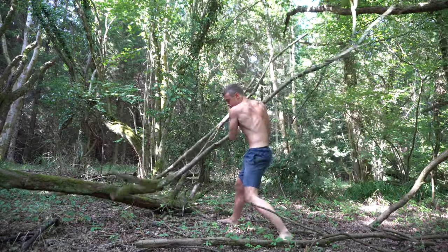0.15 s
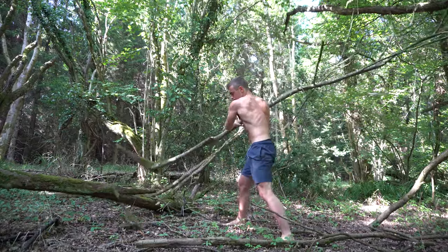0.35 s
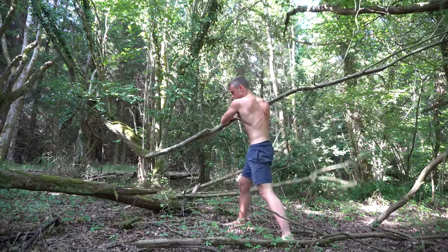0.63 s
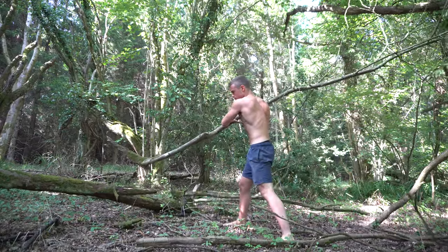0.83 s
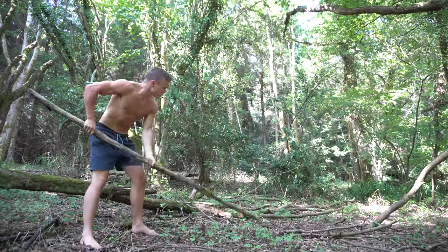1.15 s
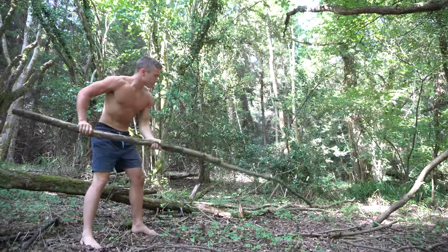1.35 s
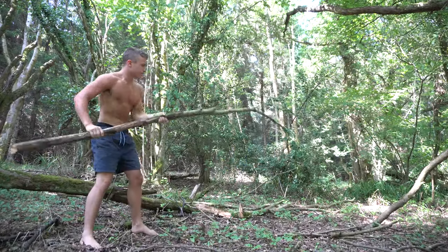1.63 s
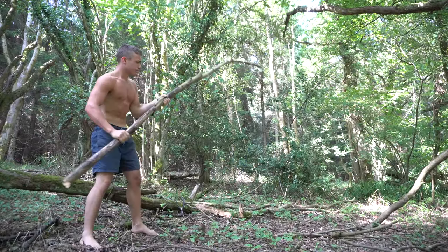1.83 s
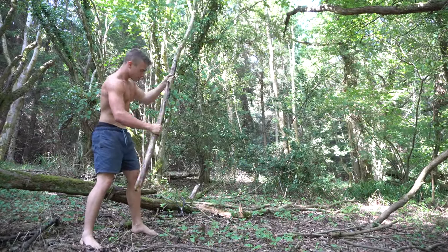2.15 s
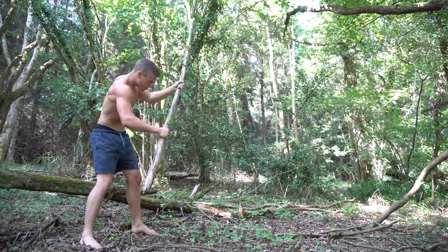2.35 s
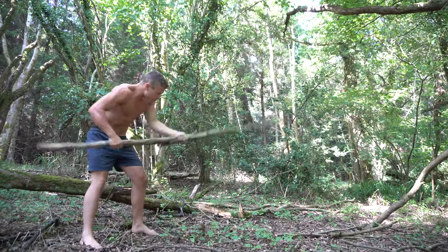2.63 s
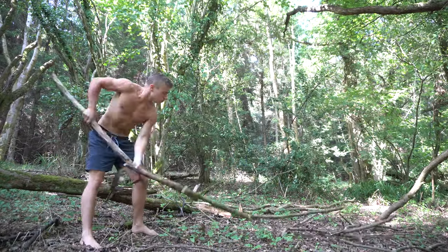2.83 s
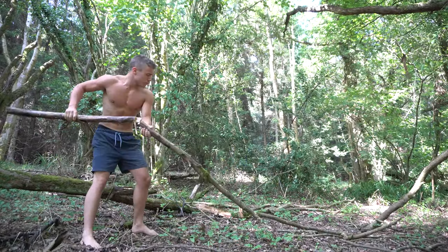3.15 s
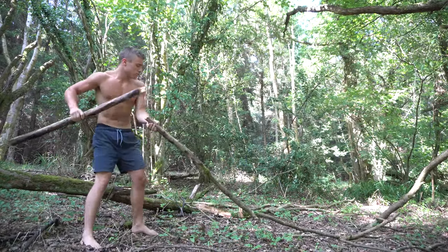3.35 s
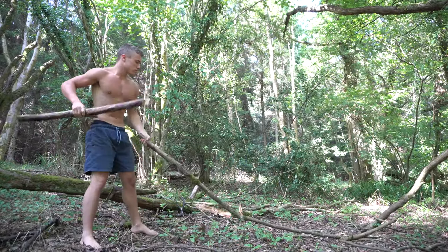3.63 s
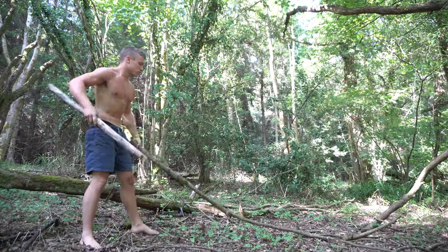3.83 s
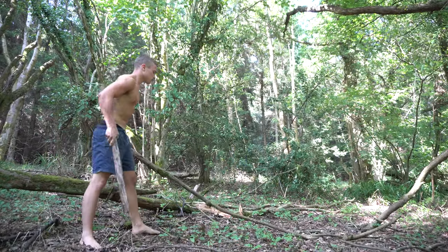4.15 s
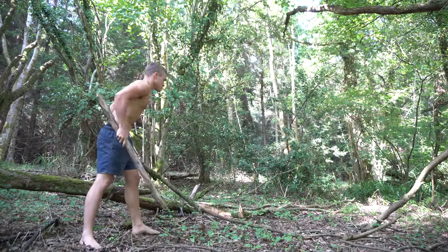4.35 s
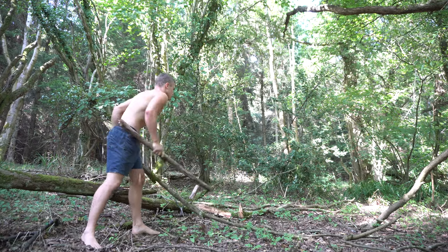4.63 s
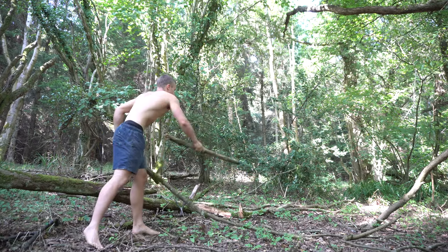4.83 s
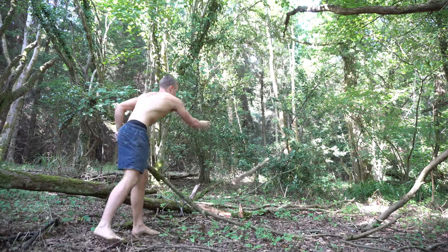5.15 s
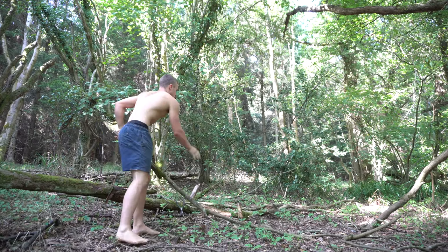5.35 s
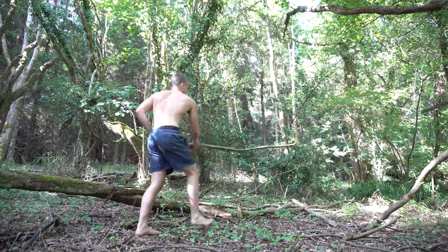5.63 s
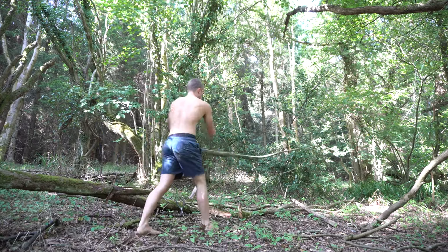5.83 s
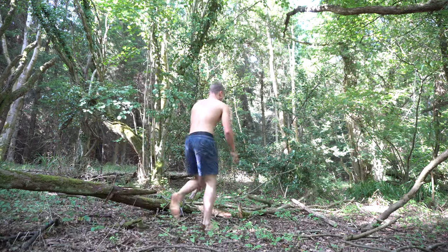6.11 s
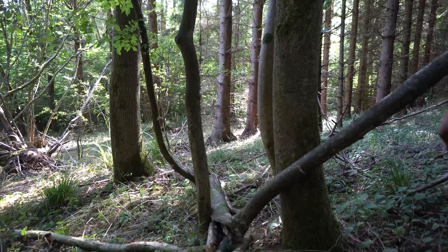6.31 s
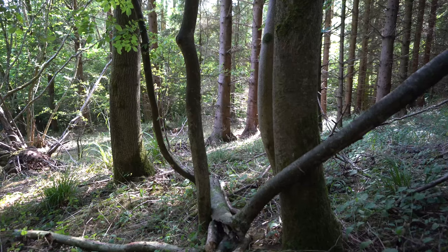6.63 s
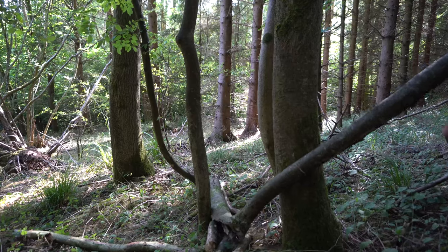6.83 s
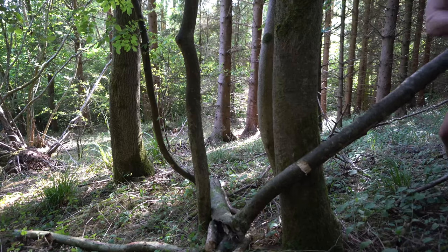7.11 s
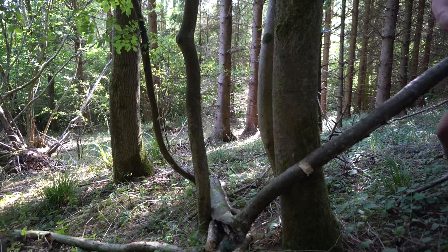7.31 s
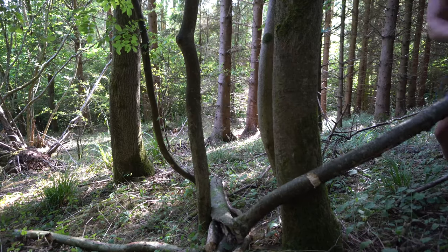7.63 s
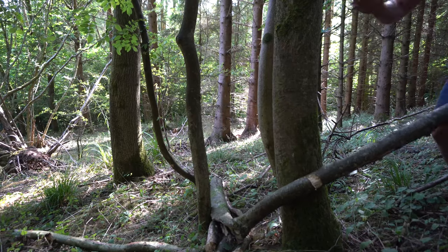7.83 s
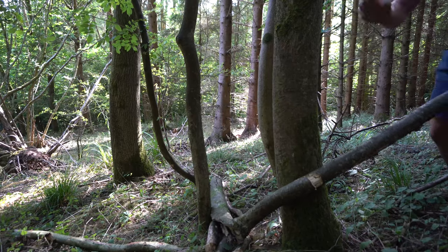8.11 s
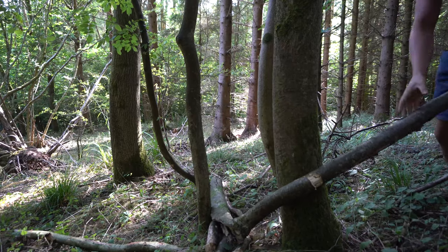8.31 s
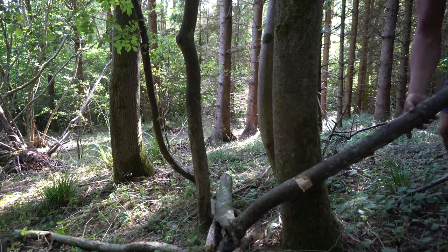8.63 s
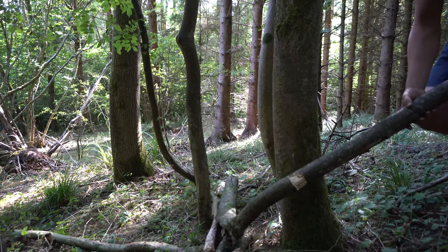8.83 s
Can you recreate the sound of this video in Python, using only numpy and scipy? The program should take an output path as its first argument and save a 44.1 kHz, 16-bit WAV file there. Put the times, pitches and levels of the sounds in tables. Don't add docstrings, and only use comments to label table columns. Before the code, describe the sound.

Brittle sticks crack loudly amid rustling leaf litter and woody thuds; abrupt scene cuts lead to splintering wood and a short rasping creak.

```python
import sys
import numpy as np
from scipy import signal
from scipy.fft import rfft, irfft, next_fast_len
from scipy.io import wavfile

SR = 44100
rng = np.random.default_rng(int(sys.argv[2]) if len(sys.argv) > 2 else 0)


def output_pcm(signal):
    pcm = np.clip(np.atleast_2d(signal).T, -1, 1) * 32767
    wavfile.write(sys.argv[1], SR, np.round(pcm).astype(np.int16))


def boost_factor(decibels):
    exponent = np.asarray(decibels, float) / 20
    return 10 ** exponent


N = 395721
T = np.arange(N) / SR
COARSE_T = T[::32]
HZ = np.fft.rfftfreq(next_fast_len(N), 1 / SR) + 1

# [t/s, peak level/dB, brightness/dB, left-right level/dB]
TWIG_TICKS = [(.065, -11, 3, 12), (0.128, -14, -2, 5), (0.392, -14, 3, -2), (.4165, -22, 12, 0),
              (0.298, -8, 16, 1), (0.566, -9.5, -3, -10), (0.588, -8, 21, 14), (2.8153, -22, 3, 10),
              (3.3058, -18, 3, 15), (3.394, -20, -2, -4), (3.582, -29, 6, 2), (3.652, -28, 0, -2),
              (3.768, -21.5, 26, 14), (3.965, -13.5, -5, -22), (4.2697, -8.5, 20, -7),
              (4.7013, -19.5, -4, -5), (6.183, -11, 10, -1), (6.1956, -14, 7, -3), (6.2275, -16, 10, -3),
              (6.259, -15, 2, -2), (6.3315, -23, 20, 0), (6.2056, -13, 13, 2), (6.2356, -9.5, 10, -2),
              (6.2945, -15.5, 11, -14), (6.352, -7.5, 5.5, -9), (6.373, -6.5, 1, -7), (7.08, -8, 7, 3),
              (7.2612, -15, 2, -3), (7.264, -4, -1, -6), (7.752, -36, 0, -7), (7.776, -38, 9, 0),
              (7.966, -23, 3, -4), (7.9925, -17, 1, -5), (8.398, -39, 18, 0), (8.407, -29, 3, -2),
              (8.4323, -18, -1.5, -3), (8.467, -24, -2, -2), (8.5278, -11, 6, -11), (8.655, -38, -3, 0),
              (8.694, -13, 17, -12), (8.756, -28, 20, -4), (8.769, -27, 21, -4), (8.79, -36, 10, 0),
              (8.935, -32, 12, -2), (8.961, -23, 6, -8), (8.9654, -18.5, 10, -12)]
# [t/s, peak level/dB, ring f/Hz, brightness/dB]
STICK_CRACKS = [(.1353, -10, 2070, -12), (.1545, -17, 2000, -6), (.1826, -7.5, 4360, -5),
                (.2115, -11, 2040, -12), (.2155, -9, 5400, -7), (.2253, -9, 3010, -10),
                (.3345, -11.5, 2900, 0), (.3511, -18, 2700, 4), (.3814, -9, 3300, 0),
                (.387, -22, 3000, -11), (.394, -14, 3600, -4), (.4585, -15.5, 2200, -7),
                (.4551, -14, 4250, -2), (.4925, -18, 4010, -7), (.5479, -11.5, 2950, -5.5),
                (.7424, -20, 2700, -6), (.7554, -11, 3300, 8), (.8607, -7, 3680, -8),
                (1.1226, -9, 1650, -14), (1.1736, -4.5, 3930, -10), (1.1962, -11, 2080, -8),
                (1.1985, -10.5, 2930, -14), (1.2459, -13.5, 1890, -10), (1.3513, -17.5, 2820, -14),
                (1.4528, -8.5, 2300, -6), (1.4548, -6, 1750, -24), (1.457, -14.5, 1100, -24),
                (1.5075, -22, 2020, -11), (1.5188, -22, 2330, -13), (1.5593, -25, 2400, -16),
                (1.5833, -22, 2400, -16), (1.6165, -23, 4700, -8), (1.6536, -36, 2120, -16),
                (1.8201, -21, 3360, -14), (1.8379, -11, 4300, 5), (2.7803, -19.5, 3360, -1),
                (2.8545, -7, 2120, -12.5), (2.8759, -8, 2380, -4), (2.859, -13, 1510, -11),
                (2.911, -14, 2060, 0), (3.1725, -19, 2200, -12), (3.1765, -19, 1200, -20),
                (3.183, -20, 2170, -18), (3.1909, -8, 1800, -24), (3.1955, -15, 1300, -29),
                (3.1975, -17, 2000, -22), (3.2045, -20, 2200, -20), (3.2125, -24.5, 1800, -18)]
# [t/s, peak level/dB, ring f/Hz, brightness/dB]
FIBRE_TEARS = [(5.4005, -15, 1070, 0), (5.4055, -12, 3250, -14), (5.4545, -9, 4700, 2),
               (5.4585, -14, 3420, -8), (5.485, -17, 4100, -13), (5.4797, -10, 4230, -8),
               (5.5045, -11.5, 2200, -11), (6.3941, -4.5, 3450, -8), (6.4247, -1, 4300, -5),
               (6.4262, -8.5, 2200, -12), (6.489, -15, 3000, -6), (6.5074, -5, 4030, -1),
               (6.6441, -18, 1930, -30), (7.0742, -11, 4200, 6), (7.0752, -16, 1890, -6),
               (7.0805, -21, 3500, -8), (7.1079, -6, 4060, 4), (7.1095, -13, 3900, -13),
               (7.1152, -0.5, 4240, -1), (7.116, -9.5, 1800, -10.5), (7.1555, -20, 2500, -10),
               (7.1755, -11, 4000, -6), (7.1908, -7, 4030, 0), (7.2135, -6, 4500, -2),
               (7.2459, -11, 2440, 7), (7.248, -13.5, 1900, -12), (7.265, -9.5, 2190, -10),
               (7.272, -15, 4000, 0), (7.1499, -7, 3500, -7), (7.1618, -1.5, 4150, -9),
               (7.1797, -17, 2900, -1), (7.182, -17, 1600, -11), (7.1927, -6, 4160, -13),
               (7.2077, -4.5, 3000, -2), (7.2166, -7.5, 3300, -4), (7.2777, -4.5, 3630, -7),
               (7.9092, -10, 4550, 6), (7.9105, -13.5, 1750, -12.5), (7.997, -26, 2300, -10),
               (8.0026, -20, 2560, 2), (8.0085, -22, 1400, -20), (8.013, -23, 1300, -23),
               (8.0175, -23, 1300, -23), (8.022, -21, 1300, -20), (8.030, -18, 1500, -16),
               (8.051, -23, 1300, -18), (8.027, -10, 5400, 18), (8.0411, -5.5, 4930, -8),
               (8.048, -9, 4300, -4), (8.1905, -7, 5250, -2)]
TICK_HZ, TICK_DB_PER_OCTAVE = 8600, 40
STICKS_PAN_DB, FIBRES_PAN_DB, PAN_SPREAD_DB = -2, -3.5, -4

# [t/s, peak level/dB]
BOUGH_SLIPS = [(8.0615, -28), (8.0675, -26), (8.0735, -22), (8.0798, -20), (8.0875, -21), (8.0941, -17),
               (8.1021, -15), (8.1115, -24), (8.119, -13), (8.131, -9), (8.1463, -8), (8.164, -8),
               (8.1835, -9), (8.2002, -10), (8.2144, -10), (8.2278, -11), (8.24, -11), (8.2526, -11),
               (8.265, -10), (8.2785, -10), (8.2959, -10)]
# [f/Hz, level/dB, T60/s]
BOUGH_MODES = [(443, -22.5, 0.034), (757, -23.5, 0.043), (882, -21, 0.046), (1404, -20, 0.03),
               (1930, -18, 0.023), (2300, -15, 0.021), (2500, -14, 0.024), (2820, -25, 0.018),
               (3050, -22, 0.024), (3420, -11.5, 0.0095), (4170, -22.5, 0.023), (4700, -2.5, 0.004),
               (6760, -2.5, 0.0022)]
JOLT_HZ, JOLT_S = 2480, 0.0013
SWEEP_END_HZ, SWEEP_S = 736, 0.00324
CHATTER_S, CHATTER_GAP_S, CHATTER_DB = 8.0075, 0.0046, -23

# [t/s, peak level/dB, body f/Hz, T60/s]
BUTT_THUDS = [(0.135, -15.5, 472, 0.062), (0.844, -13.5, 350, 0.029), (.16, -17, 600, .06),
              (1.121, -14, 496, 0.053), (1.13, -17, 603, 0.073), (2.801, -29, 112, 0.081),
              (3.965, -23.5, 340, 0.057), (5.477, -10.5, 358, 0.065), (5.484, -8, 533, 0.038),
              (5.506, -15, 249, 0.09), (5.5147, -11, 333, 0.058), (5.5195, -14, 607, 0.032),
              (5.526, -14, 590, 0.031), (6.249, -14, 450, 0.043)]
# [t/s, peak level/dB, start f/Hz, end f/Hz]
BENDING_WAVES = [
    (6.43, -27.5, 493, 230),
    (7.116, -30, 730, 196),
    (5.406, -28, 610, 310),
    (5.43, -31, 372, 294),
]
# [t/s, length/s, f/Hz, level/dB]
BARK_SQUEAKS = [(1.47, .06, 2600, -41), (1.502, 0.035, 2100, -36), (1.548, 0.042, 2500, -38),
                (1.607, 0.062, 2050, -37), (3.422, 0.0091, 2700, -36), (3.606, .01, 2600, -39),
                (3.848, 0.048, 2090, -38.5), (3.9, 0.058, 2220, -41.5), (4.989, 0.0098, 4770, -33.5),
                (5.430, .004, 3900, -32), (5.437, 0.0033, 4000, -24), (5.444, .005, 3900, -27),
                (5.450, .004, 3800, -29)]

# [t/s, hold/s, wood level/dB, leaf level/dB, fall/(dB/s)]
BRANCH_CRASHES = [(0, 0.0022, -38.5, -39, 34), (0.136, 0.058, -26, -24, 86), (0.587, 0.026, -42, -29.5, 50),
                  (0.837, 0.019, -29, -23, 64), (1.119, 0.082, -26.5, -25.5, 103),
                  (1.446, 0.045, -36.5, -33, 79), (3.958, 0.033, -42, -29, 99),
                  (5.398, 0.004, -35, -26.5, 220), (6.18, 0.004, -50, -23, 500),
                  (6.192, .003, -49, -30, 500), (6.204, 0.0074, -50, -29, 500),
                  (6.229, .03, -41, -26.5, 60), (6.264, .03, -52, -45, 60), (6.292, .002, -54, -31, 500),
                  (6.351, 0.003, -37.5, -29, 500), (6.37, .003, -44, -33, 500),
                  (6.393, 0.005, -27.5, -27, 150), (6.423, 0.046, -24.5, -27, 106),
                  (6.5, .004, -27, -39, 500), (7.11, .002, -36, -32, 1500), (7.114, 0.02, -25, -25, 46),
                  (7.287, 0.024, -37, -38.5, 84), (7.909, .004, -51, -40, 300),
                  (8.306, 0.0037, -53, -44, 94)]
BURST_DB, BURST_S = 23.5, 0.0035
# [peak t/s, rise/s, wood level/dB, leaf level/dB, fall/(dB/s)]
DRAGS_AND_STEPS = [(.395, 1, -32.5, -24, 26), (.772, 0.084, -40.5, -28, 68),
                   (1.062, 0.12, -31.5, -24.5, 60), (1.834, 0.033, -43.5, -32.5, 64),
                   (2.39, 0.41, -44.5, -41.5, 138), (2.93, 0.31, -23.5, -26.5, 83),
                   (3.19, 0.054, -38, -32.5, 80), (3.487, 1, -57, -40.5, 60),
                   (4.269, 0.17, -47, -32.5, 134), (4.46, 0.36, -48, -44.5, 92),
                   (4.716, 0.15, -53, -45, 69), (5.003, 0.15, -42.5, -38, 220), (5.542, 0.2, -30, -29, 62),
                   (5.556, 0.012, -60, -39, 500), (5.578, 0.033, -63, -40, 400),
                   (5.773, 0.34, -57, -47.5, 70), (5.92, 0.049, -53, -39, 86),
                   (6.262, 0.039, -26.5, -25, 60), (7.084, 0.079, -50, -39, 27),
                   (7.594, 0.77, -52.5, -49.5, 118), (8.03, 0.013, -34, -30, 300),
                   (8.304, 0.36, -42, -30.5, 66.5), (8.529, .003, -62, -40, 121),
                   (8.762, 0.22, -73, -44, 132)]
RISE_DB, WOOD_FALL_SHARE = 22, 0.86
# [t/s, wood level/dB, leaf level/dB]
LITTER_STIR = [(0, -48, -39), (2.6, -51.5, -52.5), (4.5, -53.5, -47), (6.1, -54, -56), (6.9, -57, -66),
               (7.8, -59, -57), (7.92, -73, -64), (8.4, -60.5, -55), (8.97, -65.5, -57)]
SCENE_CHANGES = [0, .59, 1.063, 2.852, 5.543, 6.18, 6.263, 7.285, 8.305, 9]
# [t/s, twig share level/dB]
TWIG_SHARE = [(.2, -6), (.26, 8), (.9, 4), (1.3, -3), (2.5, -8.5), (2.86, 11), (2.93, 10.5), (3.02, 4),
              (3.1, 1), (3.2, -13.5), (7.3, 7), (7.7, -18)]
# [t/s, left-right level/dB]
RUSTLE_PAN = [(0, -0.5), (3.9, 0), (5.5, 1), (8.97, -1.5)]
# [t/s, level/dB]
LOG_ROLL = [(5.397, -70), (5.4, -24), (5.42, -40), (5.471, -26.5), (5.478, -17.5), (5.5, -27), (5.52, -19),
            (5.541, -36), (5.543, -67)]
SPLINTERS_PER_S, SPLINTERS_DB = 200, -10

# [f/Hz, level/dB]
CRASH_SPECTRUM = [(180, -29), (300, -7), (451, -3), (603, -7), (806, 0), (1950, 2.5), (4530, 0),
                  (7000, -6.5), (9100, -14), (15400, -120)]
# [f/Hz, level/dB]
LEAF_SPECTRUM = [(1500, -40), (4000, -0.5), (6000, 2.5), (9000, 2.5), (13000, 2), (15700, -1.5),
                 (16200, -60)]
# [f/Hz, level/dB]
LOG_SPECTRUM = [(120, -37), (250, -4), (500, -12.5), (850, -7.5), (1300, -25)]
# [f/Hz, likeness from 0 to 1]
FIELD_LIKENESS = [(60, 1), (150, 0.99), (300, 0.97), (700, 0.83), (1500, 0.53), (3100, 0.47), (7000, 0.054),
                  (15000, 0.01)]

TREES_T60_S, TREES_DB, TREES_CUT_HZ = 0.3, -20, 13000

# [t/s, level/dB]
ROAD_LEVEL = [(0, -34.5), (.59, -38), (1.06, -35.5), (1.6, -40.5), (2.85, -38), (3.3, -42.5), (4.0, -38.5),
              (6.17, -43.5), (6.3, -39.5), (6.5, -44.5), (7.1, -39.5), (7.28, -57), (7.6, -46.5),
              (8.97, -44)]
# [f/Hz, level/dB]
ROAR_SPECTRUM = [(100, -26), (150, -6), (230, -3.5), (390, -8), (760, -1), (1000, -1), (1400, -10.5),
                 (2500, -23.5), (5000, -60)]
# [f/Hz, level/dB]
RUMBLE_SPECTRUM = [(15, -30), (30, -5.5), (60, -0.5), (100, 2), (140, 2.5), (200, -28.5)]
RUMBLE_UNDER_DB = 10
# [peak t/s, rise/s, level/dB, fall/(dB/s)]
RUMBLE_GUSTS = [
    (1.04, 0.12, -42, 60),
    (2.82, 0.17, -35, 160),
]
# [f/Hz, start t/s, end t/s, level/dB]
ENGINE_LINES = [
    (76.3, 1.09, 2.61, -46.5),
    (59.3, 1.12, 7, -55),
    (146.3, 3.3, 5.3, -55),
    (190.6, 6.4, 7.1, -56),
]


def snaps():
    out, t, rows = np.zeros((2, N)), T[:1500], fractures()
    bright = signal.butter(2, [5000, 15000], "band", fs=SR, output="sos")
    no_bass = signal.butter(2, 500, "high", fs=SR, output="sos")
    noises = rng.standard_normal((len(rows), 3, 1500))
    for (s, db, hz, bright_db, pan_db), noise in zip(rows, noises):
        thick = np.clip((-bright_db - 3.0) / 10, 0, 1)
        edges = [1300, 6000] if hz > 6500 else [hz / 1.9, hz * (1.9 - 0.45 * thick)]
        woody = signal.butter(3 if thick > 0.8 else 2, edges, "band", fs=SR, output="sos")
        fall = np.exp(-t / (0.0005 + 0.001 * thick)) + (0.35 + 0.25 * thick) * np.exp(-t / 0.004)
        burst = (noise[0] + 0.5 * noise[1:]) * fall
        burst += 10.5 * (t == 0)
        sound = signal.sosfilt(woody, burst)
        sound += 0.2 * (1 - thick) * signal.sosfilt(no_bass, burst)
        sound += boost_factor(bright_db - 2.0) * signal.sosfilt(bright, burst)
        stick = ring(burst, hz, 12 / hz)
        side_modes = sum(ring(burst, hz * ratio, 0.022) for ratio in (0.55, 0.82, 1.14, 1.36))
        stick += thick * side_modes * 0.15
        sound = sound / abs(sound).max() + 0.66 * signal.sosfilt(no_bass, stick) / abs(stick).max()
        sound = boost_factor(db + 2.1) * sides(pan_db)[:, None] * sound / abs(sound).max()
        at = place(out, s, sound)
        out[:, at] += sound[:, :at.stop - at.start]
    return out


def fractures():
    rows = []
    for s, db, bright_db, pan_db in TWIG_TICKS:
        hz = min(TICK_HZ * 2 ** (bright_db / TICK_DB_PER_OCTAVE), 14000)
        rows.append((s, db, hz, bright_db, pan_db))
    for table, pan_db in ((STICK_CRACKS, STICKS_PAN_DB), (FIBRE_TEARS, FIBRES_PAN_DB)):
        rows += [(*row, pan_db + PAN_SPREAD_DB * rng.uniform(-0.81, 1)) for row in table]
    return rows


def creak():
    out, t = np.zeros((2, N)), T[:3000]
    hz, level_db, t60 = np.transpose(BOUGH_MODES)[:, :, None]
    mode_gain = boost_factor(level_db - 60 * t / t60) * (1 - np.exp(-(t * hz) ** 2))
    jolt = np.sin(2 * np.pi * JOLT_HZ * t) * np.exp(-(t / JOLT_S) ** 4) * np.minimum(t / 0.00013, 1)
    sweep_hz = SWEEP_END_HZ + (JOLT_HZ - SWEEP_END_HZ) * np.exp(-t / SWEEP_S)
    sweep_gain = np.exp(-(t / 0.0045) ** 2) * np.minimum(t / 0.0015, 1)
    jolt += 0.39 * np.sin(2 * np.pi * np.cumsum(sweep_hz) / SR) * sweep_gain
    lean = sides(rng.normal(-3.5, 6.2, len(BOUGH_MODES)))
    slips = [(CHATTER_S + CHATTER_GAP_S * (k + 0.13 * rng.normal()), CHATTER_DB + 0.58 * k) for k in range(7)]
    slips = slips + list(BOUGH_SLIPS)
    changes = rng.normal(0, 1, (len(slips), 2, len(BOUGH_MODES)))
    grit_fall = np.exp(-t / 0.002) + 0.08 * np.exp(-t / 0.012)
    for (s, db), (level_change, pitch_change) in zip(slips, changes):
        tilt_db = 0.35 * (db + 8.5) * abs(np.log2(hz[:, 0] / JOLT_HZ))
        modes = mode_gain * np.sin(2 * np.pi * hz * (1 + 0.02 * pitch_change[:, None]) * t)
        sound = jolt * sides(-4.0)[:, None] + 3.2 * (lean * boost_factor(1.9 * level_change + tilt_db)) @ modes
        grit = np.diff(rng.standard_normal((2, 3001))) * grit_fall * boost_factor(db / 2 - 4.5)
        out[:, place(out, s, sound)] += boost_factor(db - 4.0) * (sound + grit)
    return out


def thuds():
    out, t = np.zeros(N), T[:6000]
    noises = rng.standard_normal((len(BUTT_THUDS), 6000))
    for (s, db, hz, t60), noise in zip(BUTT_THUDS, noises):
        push = (1 + 3.0 * noise) * t * np.exp(-t / 0.00056)
        body = ring(push, hz, t60)
        body = body - 1.1 * ring(push, 1.49 * hz, 0.96 * t60)
        body = body + 0.5 * ring(push, 0.775 * hz, t60)
        body = signal.sosfilt(signal.butter(2, 0.5 * hz, "high", fs=SR, output="sos"), body)
        out[place(out, s, body)] += boost_factor(db) * body / abs(body).max()
    for s, db, start_hz, end_hz in BENDING_WAVES:
        pitch_hz = end_hz + (start_hz - end_hz) * np.exp(-t / 0.0114)
        phase = 2 * np.pi * np.cumsum(pitch_hz) / SR + 2 * drift(204)[:6000]
        wave = np.sin(phase) * np.exp(-(t / 0.04) ** 2) * np.minimum(t / 0.0011, 1)
        out[place(out, s, wave)] += boost_factor(db) * wave
    return out * ((T < LOG_ROLL[-1][0]) | (T > 6))


def squeaks():
    out = np.zeros(N)
    noises = rng.standard_normal((len(BARK_SQUEAKS), 3000))
    for (s, length, hz, db), noise in zip(BARK_SQUEAKS, noises):
        tone = rms_one(ring(noise, hz, 20 / hz)) * np.sin(np.pi * np.minimum(T[:3000] / length, 1))
        out[place(out, s, tone)] += boost_factor(db) * tone
    return out


def dragging():
    crash_db, leaf_db = efforts()
    crash = stereo_noise(CRASH_SPECTRUM, crackle(400, 4.0, 2.5, 0.22))
    twigs = signal.sosfilt(signal.butter(2, 2800, "high", fs=SR, output="sos"), crash)
    boughs = signal.sosfilt(signal.butter(2, 2800, "low", fs=SR, output="sos"), crash)
    twig_db = in_time(TWIG_SHARE)[0]
    wood = boost_factor(crash_db + drift(40)) * (boost_factor(-twig_db / 2) * boughs - boost_factor(twig_db / 2) * twigs)
    wood = wood + boost_factor(crash_db + SPLINTERS_DB) * splinters()
    leaves = boost_factor(leaf_db + 1.5 * drift(30)) * stereo_noise(LEAF_SPECTRUM, crackle(500, 4.0, 1.5, 0.3))
    log = boost_factor(in_time(LOG_ROLL)[0]) * stereo_noise(LOG_SPECTRUM)
    return (wood + leaves) * sides(in_time(RUSTLE_PAN)[0]) + log


def efforts():
    wood, leaves = boost_factor(np.array(in_time(LITTER_STIR))[:, ::32]) ** 2
    rows = [(s, 0, *rest) for s, *rest in BRANCH_CRASHES]
    rows += [(s, rise, None, *rest) for s, rise, *rest in DRAGS_AND_STEPS]
    for s, rise, hold, wood_db, leaf_db, fall in rows:
        burst = 1 + (hold == 0) * boost_factor(BURST_DB) * np.exp(-abs(COARSE_T - s) / BURST_S)
        wood_gain = swell(s, rise, hold or 0, WOOD_FALL_SHARE * fall)
        leaf_gain = swell(s, rise, hold or 0, fall)
        wood = wood + boost_factor(wood_db) ** 2 * burst * wood_gain ** 2
        leaves = leaves + (boost_factor(leaf_db) * burst * leaf_gain) ** 2
    return [np.interp(T, COARSE_T, 10 * np.log10(power)) for power in (wood, leaves)]


def swell(peak, rise, hold, fall):
    climb_db = RISE_DB * (COARSE_T - peak) / max(rise, 1e-4)
    fall_db = -fall * np.maximum(COARSE_T - peak - hold, 0)
    db = np.where(COARSE_T < peak, climb_db, fall_db)
    end = np.searchsorted(SCENE_CHANGES, peak + hold / 2 - rise / 4 + 0.008)
    heard = (COARSE_T >= SCENE_CHANGES[end - 1]) * (COARSE_T < SCENE_CHANGES[end])
    return boost_factor(np.maximum(db, -200)) * heard


def splinters():
    sizes = boost_factor(4.0 * np.minimum(rng.exponential(1, N), 3.5)) * (rng.random(N) < SPLINTERS_PER_S / SR)
    dealt, rough = rng.integers(0, 12, N), rng.standard_normal(N)
    decay = np.exp(-1 / (0.0022 * SR))
    knocks = 0
    for k, hz in enumerate(np.geomspace(1200, 7000, 12)):
        burst = rough * signal.lfilter([1], [1, -decay], sizes * (dealt == k) + 1e-18)
        knocks = knocks + ring(burst, hz, 17.0 / hz) * np.sqrt(hz) * sides(rng.normal(0, 1.2))[:, None]
    return rms_one(knocks)


def trees(x):
    t = T[:SR]
    tail = rng.standard_normal((2, SR)) * boost_factor(-60 * t / TREES_T60_S) * (1 - np.exp(-t / 0.0037))
    tail = signal.sosfilt(signal.butter(1, [500, TREES_CUT_HZ], "band", fs=SR, output="sos"), tail)
    return signal.oaconvolve(x, tail / np.sqrt(np.sum(tail[0] ** 2)), axes=1)[:, :N]


def road():
    road_db = in_time(ROAD_LEVEL)[0]
    gust_power = sum((boost_factor(db) * swell(s, rise, 0, fall)) ** 2 for s, rise, db, fall in RUMBLE_GUSTS)
    gusts = np.interp(T, COARSE_T, gust_power)
    roar = boost_factor(road_db + 0.56 * drift(8)) * stereo_noise(ROAR_SPECTRUM)
    rumble = np.sqrt(boost_factor(road_db - RUMBLE_UNDER_DB) ** 2 + gusts) * stereo_noise(RUMBLE_SPECTRUM)
    for hz, start, end, db in ENGINE_LINES:
        on = np.clip(np.minimum(T - start, end - T) / 0.028, 0, 1)
        gain = np.sqrt(2) * boost_factor(db + 2.0 * drift(7.9)) * on
        rumble = rumble + gain * np.sin(2 * np.pi * np.cumsum(hz + 0.817 * drift(3.14)) / SR)
    return roar + rumble


def ring(clicks, hz, t60):
    r, w = boost_factor(-60 / (t60 * SR)), 2 * np.pi * hz / SR
    return signal.lfilter([0, np.sin(w)], [1, -2 * r * np.cos(w), r * r], clicks + 1e-18)


def crackle(per_s, spread_db, ms, share):
    sizes = boost_factor(spread_db * np.minimum(rng.exponential(1, N), 4))
    born = rng.random(N) < per_s / SR
    grains = signal.lfilter([1], [1, -np.exp(-1000 / (ms * SR))], sizes * born)
    return rms_one(1 - share + share * rms_one(grains))


def stereo_noise(spectrum, grain=1):
    mid, side = rfft(grain * rng.standard_normal((2, N)), next_fast_len(N))
    alike = np.clip(at_hz(FIELD_LIKENESS), 0, 1)
    mid, side = np.sqrt(1 + alike) * mid, np.sqrt(1 - alike) * side
    both = boost_factor(at_hz(spectrum)) * np.array([mid + side, mid - side])
    return rms_one(irfft(both, next_fast_len(N))[:, :N])


def drift(rate):
    steps = rng.standard_normal(1000)
    return np.interp(T * rate, np.arange(1000), steps) * 1.184


def sides(pan_db):
    return np.array([boost_factor(pan_db / 2), boost_factor(-pan_db / 2)])


def rms_one(x):
    return x / np.sqrt(np.mean(x ** 2) + 1e-20)


def in_time(rows):
    s, *columns = np.transpose(rows)
    return [np.interp(T, s, c) for c in columns]


def at_hz(points):
    hz, db = np.transpose(points)
    return np.interp(np.log(HZ), np.log(hz), db)


def place(out, s, sound):
    at = round(s * SR)
    return slice(at, min(at + sound.shape[-1], N))


def scene():
    breaks = snaps() + creak()
    hold = np.exp(-1 / (0.066 * SR))
    loudness = signal.lfilter([1 - hold], [1, -hold], abs(breaks).mean(axis=0))
    ducking = 1 / (1 + 12 * loudness)
    echoes = boost_factor(TREES_DB) * trees(breaks)
    return breaks + echoes + thuds() + squeaks() + ducking * dragging() + road()


def band_limit(x):
    return signal.sosfilt(signal.butter(12, 16980, fs=SR, output="sos"), x)


def record(dry):
    limited = 1.163 * np.tanh(dry / 1.244)
    steep = signal.cheby2(12, 70, 17100, fs=SR, output="sos")
    gentle = signal.cheby2(10, 16, 16000, fs=SR, output="sos")
    mix = signal.sosfilt(np.vstack([steep, gentle]), limited)
    return band_limit(mix)


dry = scene()
out = record(dry)
output_pcm(out)
```